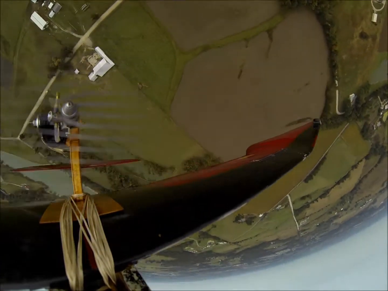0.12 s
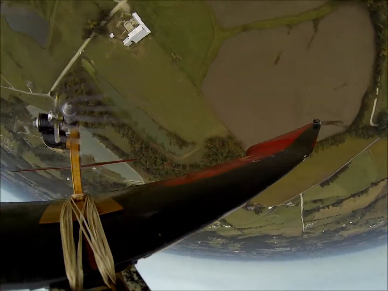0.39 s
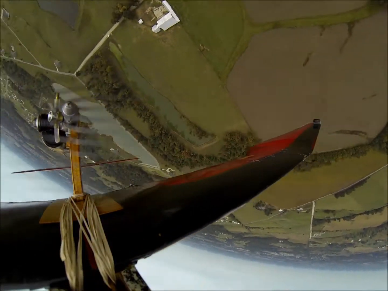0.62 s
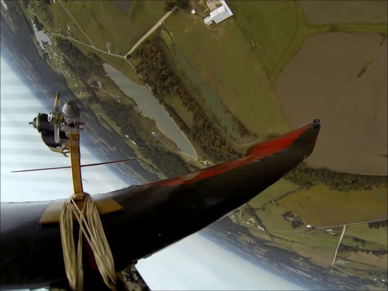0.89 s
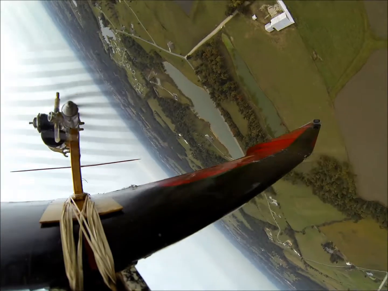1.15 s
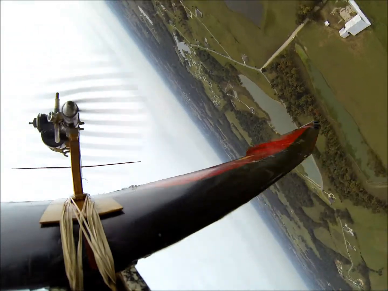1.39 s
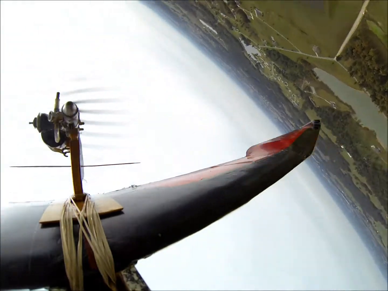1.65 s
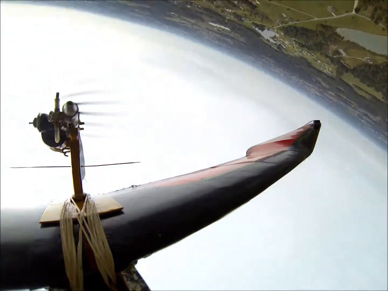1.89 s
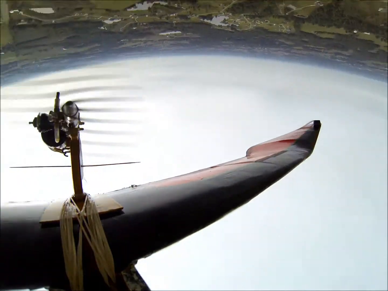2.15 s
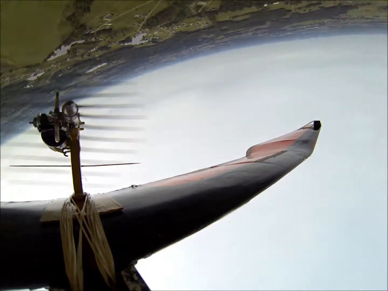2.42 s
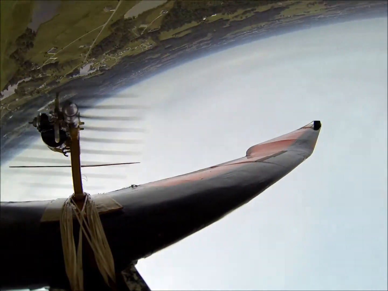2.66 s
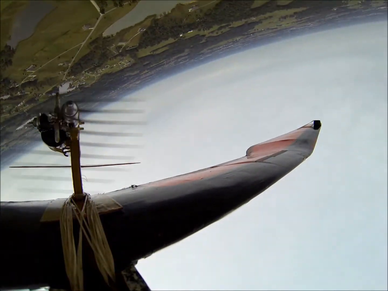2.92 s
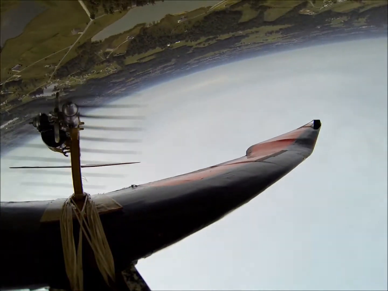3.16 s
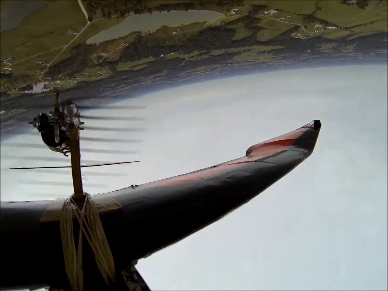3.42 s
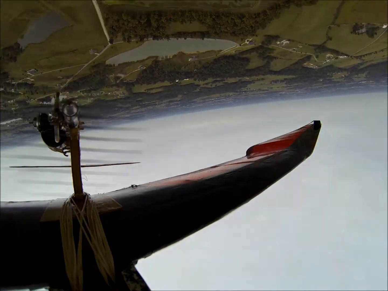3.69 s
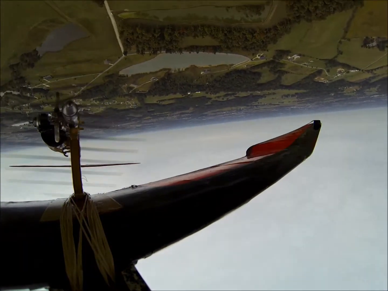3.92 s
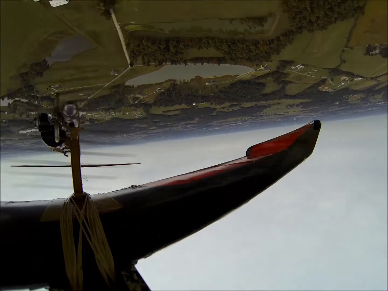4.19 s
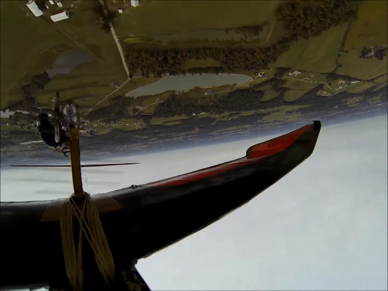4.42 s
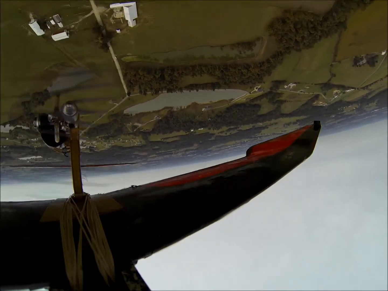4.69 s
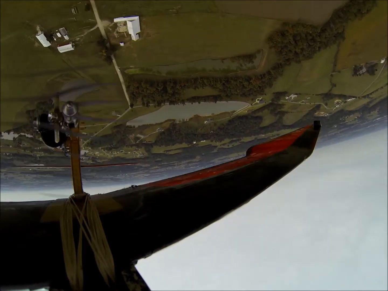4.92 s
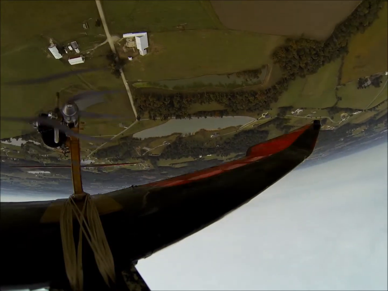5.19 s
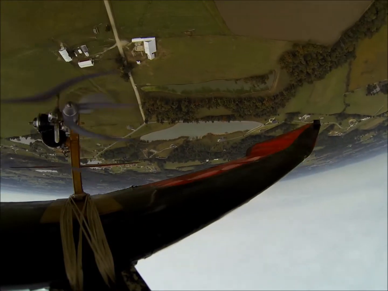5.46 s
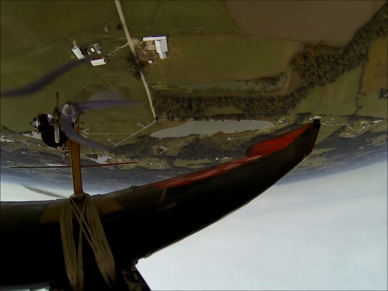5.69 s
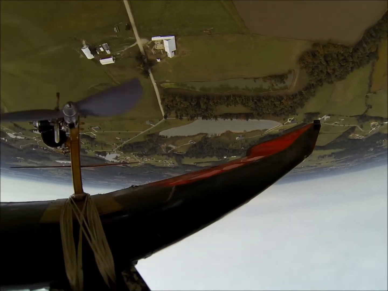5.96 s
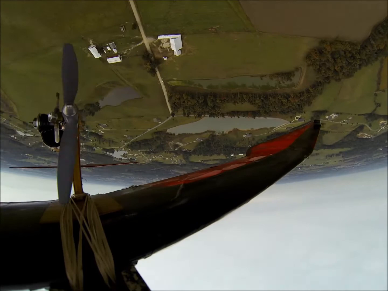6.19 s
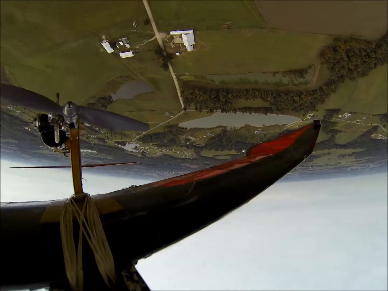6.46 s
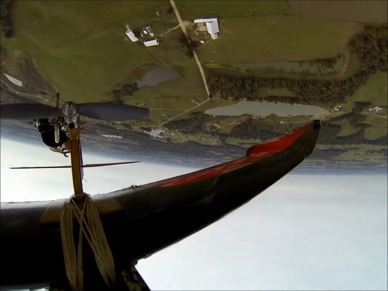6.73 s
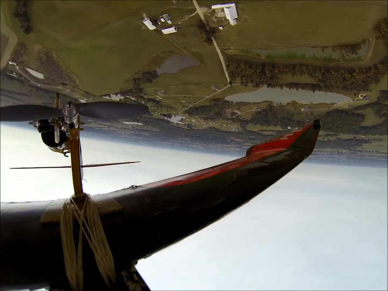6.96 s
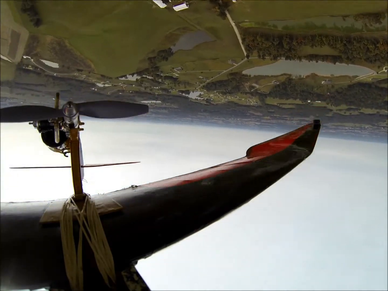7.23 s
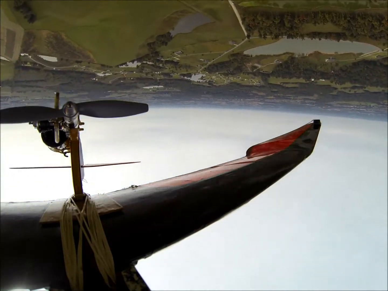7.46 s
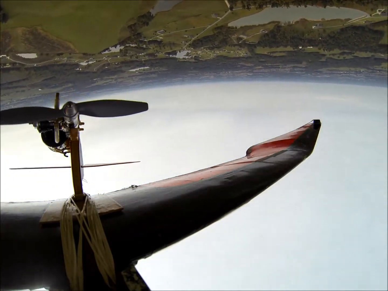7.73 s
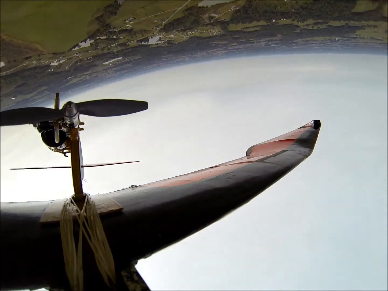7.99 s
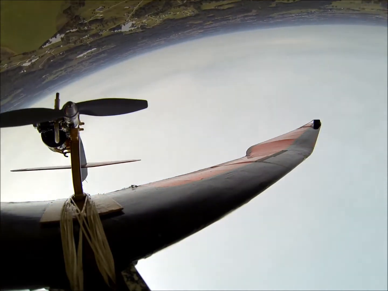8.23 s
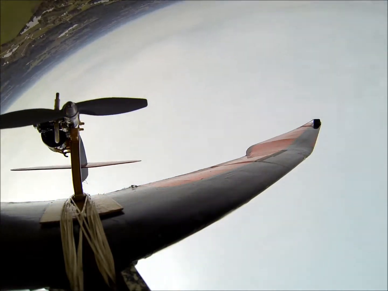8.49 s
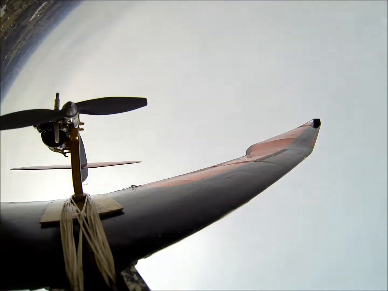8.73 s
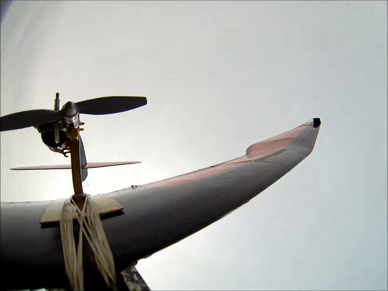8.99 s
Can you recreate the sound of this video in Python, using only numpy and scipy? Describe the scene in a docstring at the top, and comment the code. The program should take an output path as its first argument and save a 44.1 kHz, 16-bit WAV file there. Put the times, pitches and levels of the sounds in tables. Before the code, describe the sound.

Outdoors in flight, with an onboard microphone in the wind: a shrill miniature engine drones with slight pitch wavering, interrupted by a whooshing gust. It cuts out and slows quickly into separate puffs, thumps and metallic clacks until silent. Air hisses past, darkening as the glider slows, over deep rumbling. Suddenly ringing slaps burst into a rough, tearing wind roar with faint rising whistles, then dull bumps and buffeting.

```python
"""Tiny glider engine and wind

A two-stroke engine buzzes with one crack a turn over steady tones and a noisy whir, then dies.
Its propeller windmills to a stop with thumps and hisses of air and clacks of the piston.
Shaped noise makes the wind: it rumbles and buffets the microphone and rushes past as the glider slows.
In the dive come ringing slaps of air, a rough roar of ragged noise and a thin whistle of narrow noise."""
import sys
import numpy as np
from scipy import signal
from scipy.io import wavfile
from scipy.ndimage import uniform_filter1d

SR = 44100
rng = np.random.default_rng(int(sys.argv[2]) if len(sys.argv) > 2 else 0)


def wav_out(sig):
    """Save sig, one row per channel (or a flat mono array), as 16-bit PCM at SR to the path in sys.argv[1]."""
    wavfile.write(sys.argv[1], SR, np.round(np.clip(np.atleast_2d(sig).T, -1, 1) * 32767).astype(np.int16))


def how_loud(loudness_db):
    """Turn decibels into a plain amplitude multiplier (0 dB gives 1, 20 dB gives 10)."""
    steps = np.asarray(loudness_db, float) / 20
    return 10 ** steps


N = 402191
T = np.arange(N) / SR


def evened(x):
    """Scales to rms 1."""
    return x / np.sqrt(np.mean(x ** 2) + 1e-20)


def read(points, hz):
    """Reads a spectrum on a log-frequency axis."""
    f, db = np.transpose(points)
    return np.interp(np.log(hz + 1), np.log(f + 1), db)


def columns(rows, t=T):
    """Each column of a curve at the times t."""
    s, *values = np.transpose(rows)
    return [np.interp(t, s, v) for v in values]


def causal(points):
    """Shortest response with the given spectrum that starts at once (minimum phase)."""
    hz = abs(np.fft.fftfreq(4096, 1 / SR))
    log_gain = np.log(how_loud(np.maximum(read(points, hz), -80)))
    phase = -signal.hilbert(log_gain).imag
    return np.fft.ifft(np.exp(log_gain + 1j * phase)).real[:1024]


def coloured(x, points):
    """Passes x through a response of unit energy with the given spectrum."""
    shape = causal(points)
    return signal.oaconvolve(x, shape / np.linalg.norm(shape))[:N]


def pulses(turns, sizes, late):
    """One click at each whole turn, shifted by late (in samples), at its exact place between samples."""
    at = np.interp(np.arange(1, int(turns[-1])), turns, np.arange(N))
    at = at + late[:len(at)]
    taps = np.round(at).astype(int)[:, None] + np.arange(-8, 9)
    off = taps - at[:, None]
    click = np.sinc(off) * np.cos(np.pi * off / 18) ** 2
    out = np.zeros(N)
    np.add.at(out, np.clip(taps, 0, N - 1), sizes[:len(at), None] * click)
    return out


def air(shape_db, patchy_db, flicker_db, size=512):
    """Noise whose short spectra follow shape_db(s, Hz), with random patches and gusts shared by all bands."""
    hop = size // 4
    frames, hz = N // hop + 5, np.fft.rfftfreq(size, 1 / SR)[:, None]
    a, b, patches = rng.standard_normal((frames, len(hz), 3)).T
    patches = uniform_filter1d(patches, size=7, axis=0)
    patches = evened(uniform_filter1d(patches, size=9, axis=1))
    gusts = evened(uniform_filter1d(rng.standard_normal(frames), size=3))
    gain = how_loud(shape_db(np.arange(frames) * hop / SR, hz))
    gain = gain / np.sqrt((gain ** 2).mean(axis=0))
    z = (a + 1j * b) * gain * how_loud(patchy_db * patches + flicker_db * gusts)
    return evened(signal.istft(z, nperseg=size, noverlap=size - hop)[1][:N])


# How hard a side gust hits the microphone: t/s, strength/0-1
GUST = [(1.55, 0), (1.68, 0.23), (1.76, 0.67), (1.88, 1), (2.08, 0.89), (2.2, 0.52), (2.36, 0.06)]


def side_gust(t=T):
    """Strength of the side gust at the times t; it changes the engine and wind sounds together."""
    return columns(GUST, t)[0]


# Shaft speed while firing: t/s, speed/turns per s
SPEED = [(0, 289), (.24, 289.2), (.44, 288.4), (.56, 286.9), (.63, 283.9), (.96, 284.4), (1.1, 279.3),
         (1.18, 279.5), (1.2, 276.6), (1.26, 276.7), (1.35, 281.1), (1.47, 275.2), (1.52, 275), (1.6, 282),
         (1.76, 284.8), (1.9, 292.5), (2.15, 297.9), (2.3, 299.1), (2.42, 298.9), (2.46, 297.6),
         (2.53, 298.9), (2.57, 295.3), (2.82, 291.4), (2.92, 295.6), (3.02, 295.4), (3.045, 292.3),
         (3.14, 296.4), (3.22, 296.9), (3.3, 302.3), (3.39, 306.4), (3.52, 304.9), (3.55, 303.2),
         (3.67, 306.2), (3.74, 306), (3.84, 303.9), (3.86, 301), (4.03, 299.5), (4.15, 302.4), (4.25, 308),
         (4.36, 310.6), (4.44, 307.8)]
# Shaft speed once the fuel is gone: t/s, speed/turns per s
RUN_DOWN = [(4.5, 299.4), (4.58, 271.2), (4.66, 234.3), (4.76, 197.1), (4.92, 160.4), (5.12, 127.3),
            (5.393, 88.4), (5.584, 65.3), (5.668, 52.8), (5.753, 41.5), (5.808, 30.5), (5.84, 16),
            (5.93, 4.7)]
CLACK_AT_S, CLACK_PLACE = 5.8235, .52  # one clack that sets the shaft angle; its place in the turn 0-1


def shaft():
    """Speed of the shaft and the turns it has made, summed from that speed."""
    hz = columns(SPEED + RUN_DOWN)[0]
    turns = np.cumsum(hz) / SR
    return hz, turns + (CLACK_PLACE - turns[round(CLACK_AT_S * SR)]) % 1


# Colour of one exhaust crack: f/Hz, relative level/dB
EXHAUST_TONE = [(900, -28), (1350, 1.5), (1500, -5.5), (1750, 3), (2050, 4), (2900, -0.5), (3700, -4.5),
                (4300, -16.5), (4650, -8.5), (5200, -6.5), (5800, -11.5), (6300, -17.5), (7000, -5.5),
                (7800, -6), (8700, -13), (9200, -35), (11000, -30), (13500, -34), (15300, -35),
                (16000, -73)]
# Tones at 1, 2, 3 and 4 times the shaft speed, before gust, lull and fade:
# t/s, level 1/dB, level 2/dB, level 3/dB, level 4/dB
TONES = [(0, -26, -34.5, -29.5, -20.5), (.7, -26.5, -30.5, -26.5, -24.5), (1.25, -26.5, -29, -28.5, -26),
         (1.45, -25.5, -27, -25, -22.5), (2.5, -29.5, -25.5, -25, -17), (3.1, -28.5, -24.5, -28, -18.5),
         (3.4, -31.5, -24, -28, -22), (3.7, -30.5, -22.5, -28.5, -17), (4.5, -30, -21.5, -27.5, -16.5)]
# How each of those tones reacts: level added by a full gust/dB, fade without fuel/dB per s
TONES_REACT = [(11, -25), (-1, -21), (-2, -94), (-8.5, -110)]
# Colour of the whir: f/Hz, relative level/dB
WHIR_TONE = [(2000, -50), (4500, -5.5), (6500, -4), (9000, -9.5), (14000, -19), (15300, -28), (16000, -53)]
# Loudness of the whir before gust and beat: t/s, relative level/dB
WHIR_DB = [(0, -30), (1.6, -30.5), (5.0, -32), (5.5, -39.5), (5.7, -47), (5.85, -64), (6.1, -78)]
EXHAUST_DB, EXHAUST_FADE_DB_PER_S = -20, -110  # before the gust; fade without fuel
GUST_EXHAUST_DB, GUST_WHIR_DB = -8.5, -11  # what a full gust adds
FUEL_OUT_S, SILENT_S = 4.582, 4.9
LULL_S, LULL_WIDTH_S, LULL_DB = 2.26, 0.075, -6  # the tones dip briefly after the gust
SPUTTER_DB = 4  # without fuel the firings come uneven: typical loss


def engine():
    """One exhaust crack a turn over steady shaft and blade tones until the fuel runs out, plus a whir."""
    (hz, turns), gust = shaft(), side_gust()
    dead = np.maximum(T - FUEL_OUT_S, 0)  # seconds without fuel

    chance = rng.standard_normal((2000, 2))
    drift = uniform_filter1d(chance[:, 1], size=5)  # ignition wanders over a few turns
    no_fuel = np.arange(len(chance)) > turns[round(FUEL_OUT_S * SR)]
    missed_db = SPUTTER_DB * abs(chance[:, 0]) * no_fuel
    cracks = pulses(turns, how_loud(.25 * chance[:, 0] - missed_db), .45 * drift)
    exhaust_db = EXHAUST_DB + GUST_EXHAUST_DB * gust + EXHAUST_FADE_DB_PER_S * dead
    # the root keeps the power steady when the cracks come faster
    exhaust = -how_loud(exhaust_db) * 2 * np.sqrt(SR / hz) * coloured(cracks, EXHAUST_TONE)

    lull_db = LULL_DB * np.exp(-((T - LULL_S) / LULL_WIDTH_S) ** 2)
    tones = np.zeros(N)
    for k, (db, (up, fade)) in enumerate(zip(columns(TONES), TONES_REACT), start=1):
        level = how_loud(db + up * gust + fade * dead + lull_db)
        # the tones lag the crack slightly
        tones += level * np.sqrt(2) * np.sin(2 * np.pi * k * (turns - .06))

    beat = .5 + 1.23 * np.exp(-(turns % 1) / 0.094)  # the whir swells at each stroke
    whir = coloured(beat * rng.standard_normal(N), WHIR_TONE) * (T < WHIR_DB[-1][0])
    whir = how_loud(columns(WHIR_DB)[0] + GUST_WHIR_DB * gust) * whir
    firing = np.clip((SILENT_S - T) / 0.0094, 0, 1)
    return firing * (exhaust + tones) + whir


# Colour of the rumble: f/Hz, relative level/dB per Hz
RUMBLE_TONE = [(8.8, -38.5), (15, 1.5), (36, 6), (106, -10), (200, -24.5), (260, -70), (440, -120)]
# Loudness of the rumble, around which the lumps swing: t/s, level/dB
RUMBLE_DB = [(0, -47), (.4, -56), (.71, -42), (.85, -54), (1.5, -43), (1.9, -47), (2.35, -33.5), (3.3, -34),
             (4.4, -36.5), (4.75, -26), (5.28, -26.5), (5.41, -14), (5.47, -23), (5.52, -18), (5.8, -18.5),
             (5.93, -23.5), (6.1, -17), (6.8, -20.5), (7.0, -19), (7.08, -19), (7.35, -20), (7.65, -26),
             (7.9, -23), (8.3, -28), (8.8, -24), (9.12, -16)]
# Colour of the buffeting: f/Hz, relative level/dB per Hz
BUFFET_TONE = [(60, -26), (100, 4), (200, -1), (600, -8.5), (1200, -18), (2500, -37), (5000, -52),
               (12000, -79)]
# Loudness of the buffeting outside the gust, around which the lumps swing: t/s, level/dB
BUFFET_DB = [(0, -55), (1.5, -49.5), (2.7, -44.5), (4.5, -43), (4.95, -32), (5.05, -28), (5.6, -25.5),
             (5.88, -37), (6.0, -27), (6.1, -38), (6.25, -28.5), (6.45, -36.5), (6.85, -32), (6.92, -27),
             (7.06, -26.5), (7.11, -23), (7.4, -18), (8.0, -25), (8.6, -19.5), (8.69, -24), (8.8, -17.5),
             (9.12, -16.5)]
GUST_BUFFET_DB = 28.5  # what a full gust adds


def wind():
    """Lumpy pressure on the microphone: a deep rumble and broader, spiky buffeting."""
    buffet_db = columns(BUFFET_DB)[0] + GUST_BUFFET_DB * side_gust()
    # the wind comes in lumps
    lumps = uniform_filter1d(rng.standard_normal((2, N)), size=1800)
    lumps = evened(uniform_filter1d(lumps, size=1200))
    rumble = air(lambda t, hz: read(RUMBLE_TONE, hz) + 0 * t, 0.77, 0.62, size=4096)
    buffet = air(lambda t, hz: read(BUFFET_TONE, hz) + 0 * t, 0.79, 0.72, size=384)
    rumble = how_loud(columns(RUMBLE_DB)[0] + 2.4 * lumps[0]) * rumble
    return rumble + how_loud(buffet_db + 1.67 * lumps[1]) * buffet


# Loudness of the airflow past the housing, before the chop: t/s, level/dB
RUSH_DB = [(0, -40.5), (1.4, -34.5), (1.62, -25.5), (1.72, -15), (1.82, -21), (1.95, -24), (2.12, -18),
           (2.26, -26.5), (2.45, -26.5), (3.3, -27.5), (4.45, -28), (4.62, -21), (4.82, -19.5),
           (5.6, -18.5), (5.9, -24), (6.0, -18.5), (6.1, -22.5), (6.7, -26), (6.8, -24), (7.05, -29.5),
           (7.15, -67)]
# Its colour before edge and tilt: f/Hz, relative level/dB per Hz
RUSH_TONE = [(200, -17.5), (400, -10), (600, -5.5), (1200, -1.5), (2200, -1), (4000, -3)]
# As the glider slows, outside the gust: t/s, upper edge f/Hz, tilt under the edge/dB per octave
GLIDE = [(1.5, 4000, -2), (2.4, 4320, 1.5), (4.6, 4020, 1.5), (5.85, 2920, 0.5), (6.05, 2550, 1),
         (6.7, 2260, -0.5), (6.93, 1900, -2.5)]
GUST_EDGE_HZ, GUST_TILT_DB = -1700, -10.5  # what a full gust adds to edge and tilt


def rush():
    """Smooth hiss with a sharp upper edge that sinks as the glider slows."""
    def shape_db(t, hz):
        """Tilted up to the edge, steep over it, then a gentle skirt."""
        (edge_hz, tilt_db), gust = columns(GLIDE, t), side_gust(t)
        edge_hz = edge_hz + GUST_EDGE_HZ * gust
        tilt_db = tilt_db + GUST_TILT_DB * gust
        over = np.log2(np.maximum(hz / edge_hz, 1))  # octaves
        under = np.log2(np.clip(hz / edge_hz, .1, 1))
        return read(RUSH_TONE, hz) + tilt_db * under - np.minimum(45 * over, 16 + 16 * over)
    turns = shaft()[1]
    windmilling = np.clip(np.minimum(T - 4.55, 5.8 - T) / .05, 0, 1)
    chop = 1 + .45 * windmilling * np.cos(2 * np.pi * turns)  # the slowing propeller chops the flow
    return how_loud(columns(RUSH_DB)[0]) * chop * air(shape_db, 0.61, 1.23)


# Air pumped while coasting: t/s, thump relative level/dB, hiss relative level/dB
COASTING = [(4.45, -38, -53), (4.57, -21, -30), (4.62, -19, -20), (5.0, -11.5, -23), (5.4, -15, -35),
            (5.6, -14, -28), (5.72, -19, -31), (5.82, -7, -46), (5.92, -28, -44)]
# Colour of the hiss: f/Hz, relative level/dB
HISS_TONE = [(3000, -25), (5000, 3.5), (7000, 2), (9000, -9), (11000, -64), (15500, -57)]
# Loudness of the piston clacks: t/s, relative level/dB
CLACKS = [(5.0, -52), (5.3, -35), (5.4, -17), (5.5, -12.5), (5.6, -14.5), (5.82, -20.5), (5.92, -29)]
# Colour of the clacks: f/Hz, relative level/dB
CLACK_TONE = [(2350, -48), (4000, -15), (4400, 1), (4850, -6), (5720, -7), (7050, -1), (8500, -17),
              (9360, -12), (10800, -27), (11700, -15), (12800, -23), (14000, -15), (15500, -39)]
# Loudness of the dead engine's growl: t/s, relative level/dB
PUMPING = [(4.6, -51), (4.8, -28.5), (5.1, -23.5), (5.4, -27), (5.7, -36), (5.85, -51)]
# Strength of the growl's harmonics by pitch: f/Hz, relative level/dB
PUMPING_TONE = [(60, 2), (130, -5.5), (250, 0), (400, -5.5), (550, -6), (750, -1.5), (1000, -10),
                (1500, -28)]


def coasting():
    """The dead engine pumps a thump and a hiss of air each turn; near the stop the piston clacks between."""
    (thump_db, hiss_db), clack_db, (hz, turns) = columns(COASTING), columns(CLACKS)[0], shaft()
    chance = rng.standard_normal((2000, 3))
    on_time = np.zeros(len(chance))
    live = (T > COASTING[0][0]) & (T < COASTING[-1][0])
    t = np.arange(300) / SR

    strokes = pulses(turns, how_loud(0.46 * chance[:, 0]), on_time) * live
    bump = np.exp(-.5 * ((t - .001) / .00015) ** 2)
    thumps = signal.oaconvolve(how_loud(thump_db) * strokes, bump)[:N]
    thumps = signal.lfilter([1, -1], [1, -.985], thumps)  # takes out the slow part

    puffs = how_loud(hiss_db) * pulses(turns, how_loud(2.4 * chance[:, 1]), .7 * chance[:, 2]) * live
    burst = abs(signal.oaconvolve(puffs, t / 0.0012 * np.exp(1 - t / 0.00024))[:N])
    hiss = coloured(burst * rng.standard_normal(N) - 6 * puffs, HISS_TONE)

    knocks = pulses(turns - CLACK_PLACE + 1, how_loud(1.7 * chance[:, 2]), on_time)
    knocks = how_loud(clack_db) * knocks * live
    rattle = 0.31 * signal.oaconvolve(knocks, np.exp(-t / 0.002))[:N] * rng.standard_normal(N)
    clacks = coloured(3 * knocks + rattle, CLACK_TONE)

    growl = np.zeros(N)
    for k in range(1, 13):
        growl += how_loud(read(PUMPING_TONE, k * hz)) * np.cos(2 * np.pi * k * (turns - .001 * hz))
    return how_loud(columns(PUMPING)[0]) * live * growl + thumps + hiss + clacks


# Sudden slaps of air: t/s, relative level/dB, ring f/Hz
SLAPS = [(6.978, -12, 939), (6.998, -13, 1350), (7.017, -7, 1360), (7.06, -3, 2460), (7.092, -2, 1310),
         (7.112, -4, 2540), (7.139, -2, 2580), (7.189, -5, 2680), (7.269, -5, 1860), (8.044, -4, 1530),
         (8.977, -8, 517), (9.025, -8, 598), (9.033, -6, 528), (9.08, -2, 764), (9.105, -9, 711),
         (9.112, -7, 840)]
# Colour of their puffs: f/Hz, relative level/dB
SLAP_TONE = [(150, -10), (400, 0), (1500, -3), (3000, -15), (6000, -36), (12000, -60)]


def slaps():
    """Each slap is a few milliseconds of ringing with a dull puff of noise."""
    ring, puff, t = np.zeros(N + 900), np.zeros(N + 900), np.arange(900) / SR
    swell = (t / .0025 * np.exp(1 - t / .0025)) ** 2
    for (s, db, hz), noise in zip(SLAPS, rng.standard_normal((len(SLAPS), 900))):
        start = round(s * SR)
        ring[start:][:900] += how_loud(db) * swell * np.sin(2 * np.pi * hz * t)
        puff[start:][:900] += how_loud(1.32 * db + 3.5) * swell * noise  # stronger slaps carry more noise
    return .55 * ring[:N] + .27 * coloured(puff[:N], SLAP_TONE)


# Flow torn loose: t/s, level/dB, treble against it/dB
ROAR = [(7.045, -20, -48), (7.085, -19, -51), (7.095, -14, -30), (7.16, -19, -20.5), (7.36, -14, -24.5),
        (7.41, -20, -22), (7.53, -16.5, -23.5), (7.6, -16.5, -23.5), (7.72, -14.5, -19.5), (7.8, -18, -21),
        (7.91, -14, -21.5), (7.99, -19.5, -20.5), (8.1, -15.5, -20), (8.3, -14, -20.5), (8.45, -12.5, -17),
        (8.58, -14.5, -21.5), (8.615, -15, -23), (8.65, -38, -32)]
# Its colour before the treble changes: f/Hz, relative level/dB per Hz
ROAR_TONE = [(120, -25), (200, -13.5), (602, -6), (1850, -4.5), (2600, -8.5), (2900, -10.5), (3410, -16.5),
             (8120, -44.5), (12700, -59.5), (15000, -70)]


def roar():
    """Flow torn loose: ragged wide noise whose treble starts dull, opens up and then varies."""
    def shape_db(t, hz):
        """Tilts the part over the knee at 2500 Hz."""
        treble_db = columns(ROAR, t)[1] + 24
        return read(ROAR_TONE, hz) + treble_db * np.clip(np.log2(hz / 2500 + 1e-9) / 1.1, 0, 1.5)
    edges = np.clip(np.minimum(T - ROAR[0][0], ROAR[-1][0] - T) / 0.013, 0, 1)
    return edges * how_loud(columns(ROAR)[0]) * air(shape_db, 1.6, 2.4, size=256)


# Whistles: start t/s, end t/s, start f/Hz, end f/Hz, level/dB
WHISTLE = [(7.09, 7.29, 2580, 2750, -24), (7.69, 8.01, 2850, 2900, -25.5), (8.03, 8.2, 2940, 2990, -26.5),
           (8.2, 8.38, 3010, 3330, -27)]


def whistle():
    """An edge tone: a narrow band of noise that glides slowly upward."""
    out = np.zeros(N)
    r = np.exp(-np.pi * 130 / SR)  # sets how narrow the band is
    for start, end, from_hz, to_hz, db in WHISTLE:
        hz = np.interp(T, [start, end], [from_hz, to_hz])
        noise = rng.standard_normal(N) + 1j * rng.standard_normal(N)
        waver = signal.lfilter([1], np.poly([r, r]), noise)
        waver = .8 + evened(waver.real) + 1j * evened(waver.imag)  # .8 is a steady part
        tone = (waver * np.exp(2j * np.pi * np.cumsum(hz) / SR)).real
        edges = np.clip(np.minimum(T - start, end - T) / 0.023, 0, 1)
        out += edges * how_loud(db) * evened(tone)
    return out


def scene():
    """Everything reaches one microphone."""
    return (engine() + wind() + rush() + coasting() + slaps() + roar() + whistle())[None]


def band_limit(x):
    """A steep low-pass at the top of the band."""
    return signal.sosfilt(signal.butter(12, 15700, fs=SR, output="sos"), x)


def record(dry):
    """Soft overload on the peaks, then the upper band limit and a hard ceiling."""
    soft = 1.5 * np.tanh(dry / 1.5)
    band = signal.oaconvolve(soft, signal.firwin(101, 15300, fs=SR)[None], "same")  # limit in Hz
    return band_limit(np.clip(band, -.98, .98))


dry = scene()
out = record(dry)
wav_out(out)
```